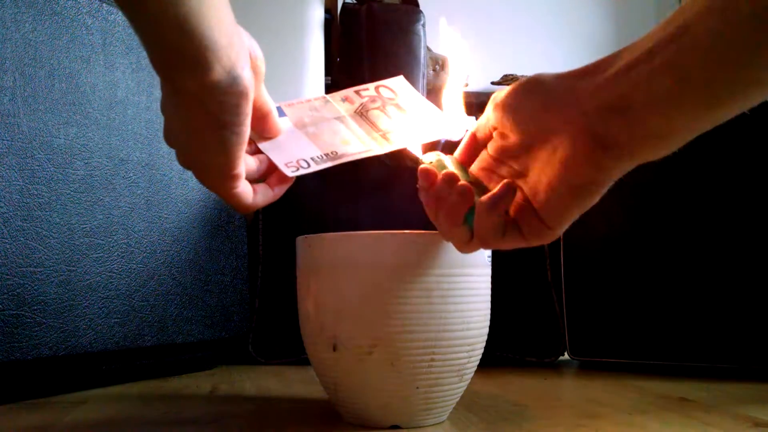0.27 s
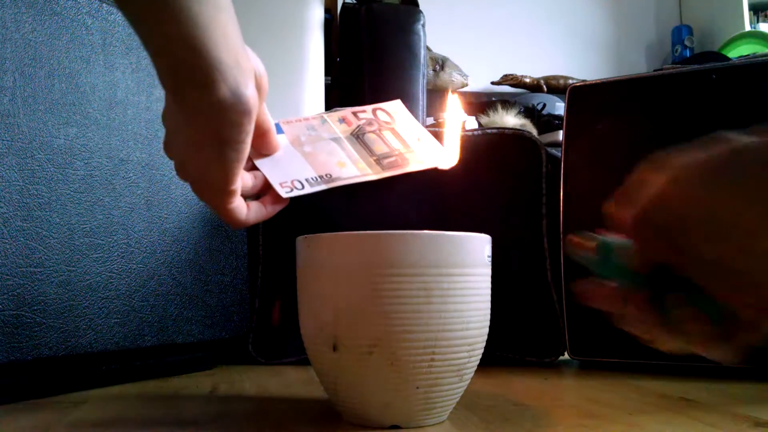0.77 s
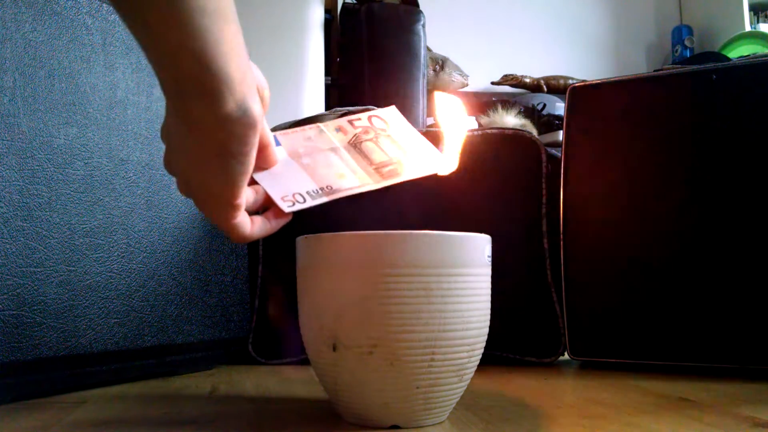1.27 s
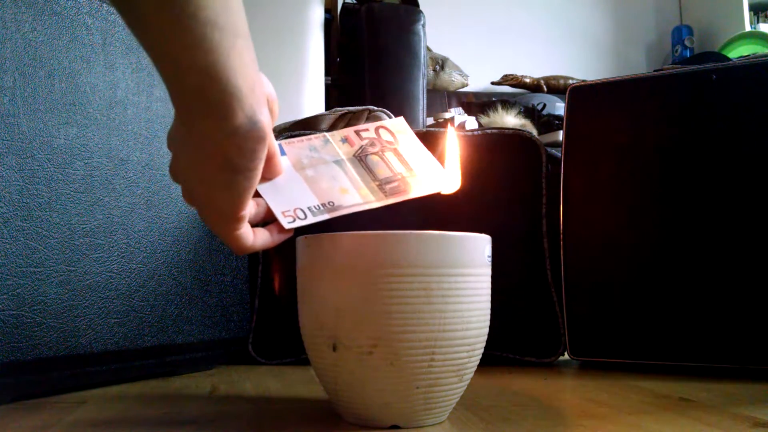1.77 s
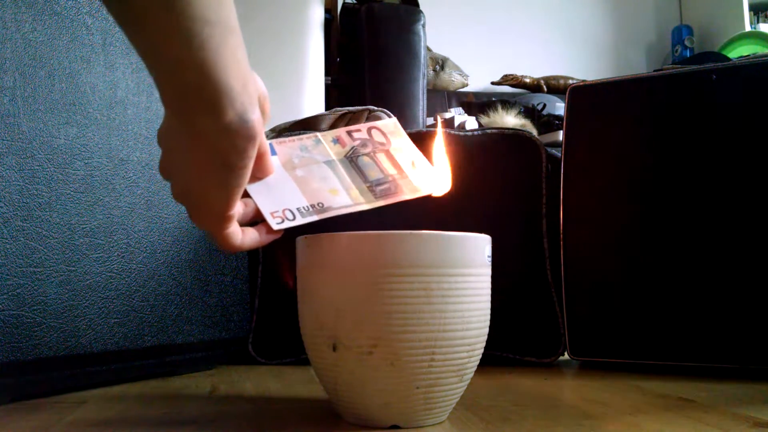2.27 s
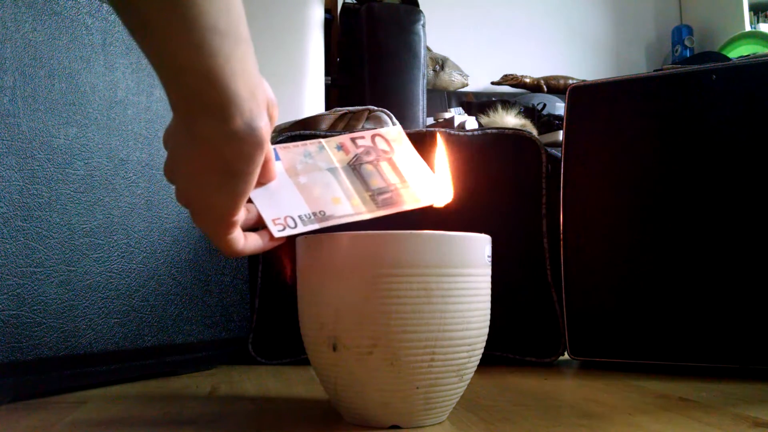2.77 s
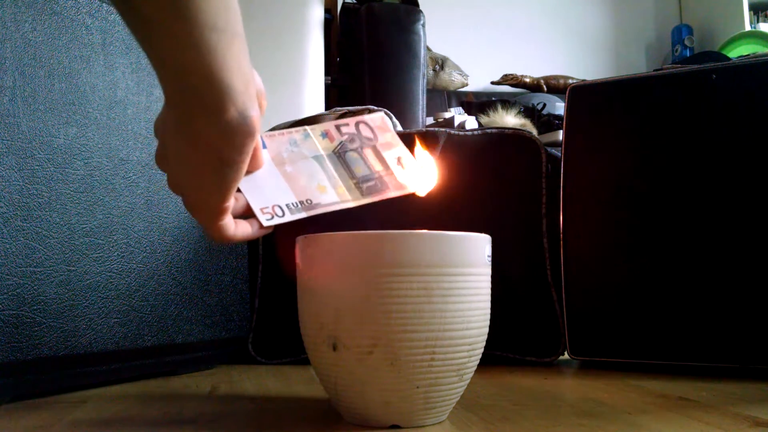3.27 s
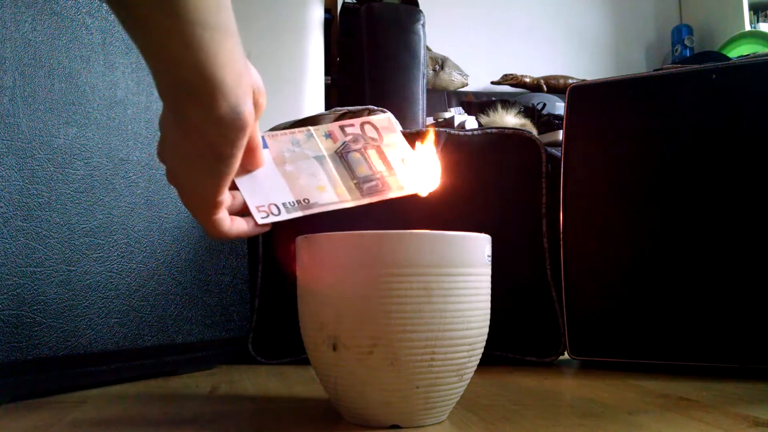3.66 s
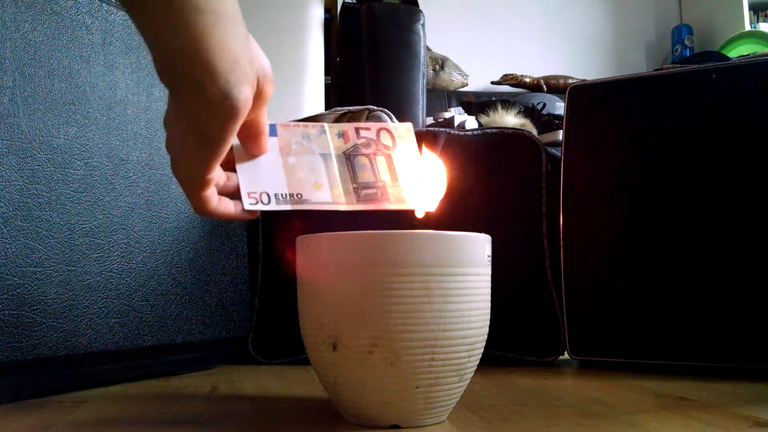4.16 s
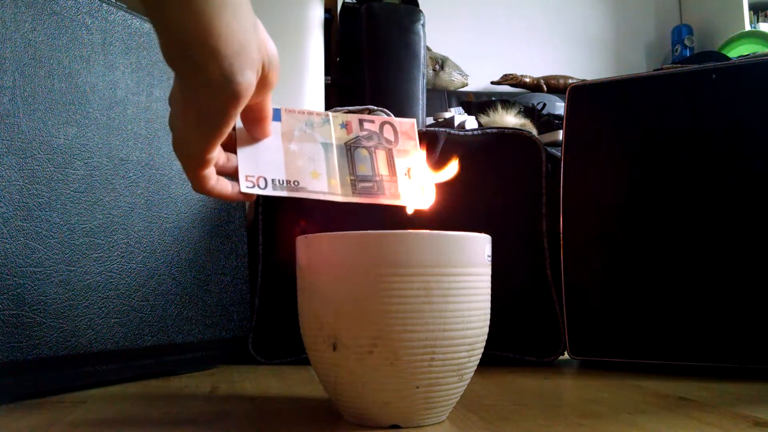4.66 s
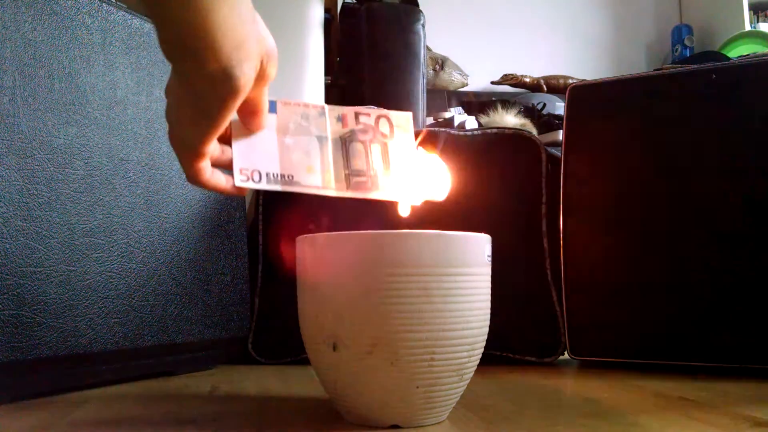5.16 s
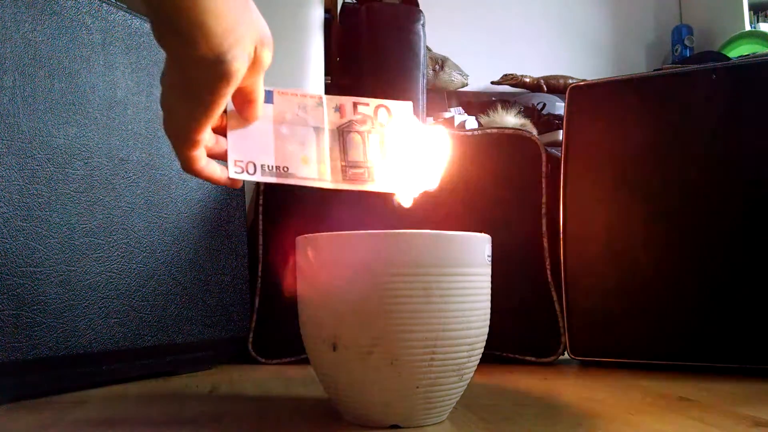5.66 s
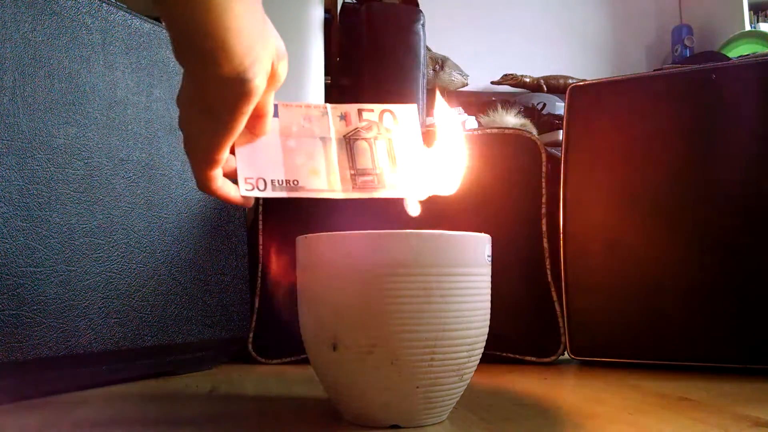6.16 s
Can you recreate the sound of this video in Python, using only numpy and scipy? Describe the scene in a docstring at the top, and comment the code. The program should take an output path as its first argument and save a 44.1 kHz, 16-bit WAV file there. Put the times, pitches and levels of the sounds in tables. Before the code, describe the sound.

A paper note burns close by in a quiet room, with a soft, high hiss and scattered tiny crackles throughout. In the first half second a lighter gives several small clicks and brief rushes of flame, followed by a soft bump. At about 1.7 seconds the plastic lighter hits a wooden floor with a sharp, hollow knock, by far the loudest sound, then bounces and settles by 1.9 seconds. A dull bump and a short sleeve rustle come at 2.4 seconds, with more soft floor bumps around 3.8 and 4.4 seconds. The crackles become more frequent from about 2.8 seconds, joined by small hollow pops from a ceramic pot under the flame. From 5.4 seconds until the end, near 6.4, the fire grows livelier, with stronger hiss, sharper snaps and a faint low flutter. Further off, something ticks faintly and evenly, about every two thirds of a second.

```python
"""Paper burning over a ceramic pot

The flame hisses, crackles and drives the air in the pot as a cavity resonator. A lighter is handled,
then dropped on a wooden floor, where it bounces and excites the modes of boards and shell. Soft bumps
come through the floor, and something ticks evenly further off in the room. Two microphone ports a
hand apart are cross-subtracted with a delay to widen the stereo image."""
import sys
import numpy as np
from scipy import signal
from scipy.fft import rfft, irfft, next_fast_len
from scipy.io import wavfile

SR = 44100
rng = np.random.default_rng(int(sys.argv[2]) if len(sys.argv) > 2 else 0)


def master(y):
    """Save y as 16-bit WAV."""
    cut = np.clip(np.atleast_2d(y).T, -1, 1)
    pcm = np.round(cut * 32767)  # scale
    wavfile.write(sys.argv[1], SR, pcm.astype(np.int16))


N = 283122
SIZE = next_fast_len(N + SR)   # room for tails
HZ = np.fft.rfftfreq(SIZE, 1 / SR)

# Vigour of the fire, as the level of its hiss: t/s, level/dB
FIRE_VIGOUR = [(0.0, -55), (0.3, -53.5), (0.65, -58), (1.1, -55.5), (1.5, -59.5), (2.2, -55.5), (2.9, -56),
               (3.4, -55.5), (3.75, -59.5), (4.25, -56), (4.6, -57.5), (4.95, -54.5), (5.4, -54.5),
               (5.62, -48.5), (5.93, -54.5), (6.15, -51), (6.42, -52)]
# Wandering centre of a bright band in the hiss: t/s, f/Hz
SIZZLE_CENTRE = [(0.0, 12300), (4.3, 12070), (4.9, 12700), (5.6, 11570), (5.9, 12140), (6.2, 12900),
                 (6.42, 12600)]
# Loudest crackles of the paper: t/s, level/dB, f/Hz, body relative to snap/dB
PAPER_CRACKLES = [(0.8909, -37, 11200, -8), (1.0969, -37, 10000, 2), (1.217, -40, 9000, 5),
                  (1.2445, -33.5, 10000, -6), (1.5773, -35, 11300, -16), (2.182, -41, 12500, -11),
                  (2.3037, -38, 11900, -18), (2.6754, -37, 12500, -4), (2.718, -46, 13000, -13),
                  (2.852, -30, 9900, -3), (2.855, -24, 12400, -6), (3.0182, -33, 11500, 0),
                  (3.045, -42, 13500, -18), (3.117, -39, 9740, -3), (3.143, -35, 12500, -1),
                  (3.179, -38, 11800, -7), (3.495, -37, 9830, -5), (3.5544, -34, 12900, -8),
                  (3.5944, -31, 14500, -13), (3.7724, -33, 14500, -10), (3.9216, -29.5, 13000, -14),
                  (4.1463, -30, 13500, -13), (4.367, -43, 10000, -12), (4.497, -35, 10500, -12),
                  (4.6414, -29, 13500, -17), (4.81, -34, 12100, 2), (4.9125, -30, 12700, -20),
                  (5.184, -32, 12600, -10), (5.2475, -38, 12100, -8), (5.426, -36, 12000, 5),
                  (5.5094, -34, 12000, -1), (5.538, -31, 11200, 1), (5.5517, -27, 11400, -1.5),
                  (5.608, -34.5, 10700, 4.5), (5.706, -36, 9150, 5), (5.7584, -35, 11900, -16),
                  (5.8631, -35, 12500, -10), (5.9714, -36, 12000, -9), (6.075, -33, 12000, 1),
                  (6.141, -41, 12400, -10), (6.156, -21.5, 12700, -30), (6.2248, -25.5, 12900, -7),
                  (6.255, -25.5, 12400, -2), (6.3156, -38, 12500, 0)]
# Short hollow pops of the pot, from flame puffs and the tick's second blow: t/s, level/dB
POT_POPS = [(0.822, -42.5), (1.033, -49), (1.332, -47), (2.58, -48), (2.83, -38), (2.852, -41),
            (2.974, -44.5), (3.693, -44), (4.05, -46), (4.459, -40), (4.887, -46.5), (4.979, -41.5),
            (5.093, -40), (5.189, -48), (5.318, -42.5), (5.344, -42.5), (5.455, -35), (5.539, -42.5),
            (5.679, -35), (5.751, -39), (5.818, -37), (5.916, -55), (5.982, -36), (6.098, -38),
            (6.157, -50), (6.254, -32.5), (6.293, -36), (6.33, -38)]
# Low flutter of the flame: t/s, level/dB
FLUTTER_LEVEL = [(0.0, -58), (0.5, -72), (1.1, -81), (1.7, -74), (2.43, -72), (3.0, -62), (3.5, -71),
                 (3.92, -66), (4.43, -71.5), (5.4, -66.5), (5.65, -56), (5.95, -70), (6.42, -58)]
# Brief rushes of noise, the lighter's flame humming in the pot, hand and sleeve rustles, then two sputters of
# the fire: # t/s, hold/s, level/dB, swell/(dB/s), fade/(dB/s), grain/dB, pot hum/dB
RUSHES = [(0.0, 0.013, -48.5, 28, 101, 3, -21), (0.073, 0.043, -51.5, 150, 200, 4, 2.5),
          (0.279, 0.0065, -43.5, 6000, 500, 4.5, -19), (0.31, 0.0054, -51, 3000, 400, 2.5, -11),
          (0.335, 0.0073, -57, 1500, 202, 5, -19), (2.43, 0.19, -49, 133, 114, 1.6, -19),
          (3.49, 0.028, -53, 300, 180, 2, -3.5), (5.32, 0.02, -55, 1000, 300, 3.5, -10),
          (6.06, 0.036, -54, 400, 200, 2.5, -12)]
# Clicks of the lighter in the hand: t/s, level/dB
LIGHTER_CLICKS = [(0.0284, -50), (0.0352, -54), (0.0697, -40), (0.2406, -49), (0.2782, -37), (0.307, -36),
                  (0.3376, -40), (0.344, -44)]
# Modes of the ticking object: f/Hz, level/dB, T60/s
TICK_MODES = [(1270, 6, 0.19), (1290, -0.5, 0.13), (1730, 1.5, 0.13)]
# Soft bumps through the floor: t/s, level/dB, f/Hz
FLOOR_BUMPS = [(0.452, -33.5, 212), (0.668, -40.5, 200), (0.743, -42, 230), (0.886, -41.5, 226),
               (1.032, -46.5, 220), (1.203, -43, 250), (1.262, -43, 150), (1.377, -46, 190),
               (2.412, -32.5, 164), (3.7504, -38, 244), (3.767, -41, 230), (3.803, -36.5, 216),
               (4.377, -35, 202), (5.227, -45, 201), (5.619, -37.5, 143), (5.749, -38.5, 205),
               (6.053, -42, 180)]
# Fall, bounce and two settling touches of the lighter: t/s, level/dB, brightness/dB, pot response/dB,
# board tilt/(dB/octave), tank knock/dB, position along the boards (0 near, 1 far)
LANDINGS = [(1.654, -2, -2.5, 2, -1.5, -45, 0.0), (1.805, -10.5, 0, 3.5, 4, -23.5, 1.0),
            (1.8093, -21, -10, 8, -1, -26, 0.9), (1.874, -28, -11, -6, -4, -38, 0.94)]
# Modes of the floorboards: f/Hz, level/dB, T60/s, change at the far position/dB
BOARD_MODES = [(161, -7, 0.072, -1), (198, -7, 0.12, -6), (276, -19, 0.06, -2), (393, -3, 0.037, -1),
               (432, -14.5, 0.08, -2), (485, -1.5, 0.095, -4), (535, -11, 0.11, -11), (728, -20, 0.14, -1),
               (773, -17, 0.08, 5.5), (840, -20, 0.075, 7), (895, -7.5, 0.039, -4),
               (1157, -5.5, 0.016, -1.5), (1432, -14, 0.033, 0.5), (1550, -21.5, 0.065, -1),
               (1690, -12.5, 0.014, 3.5), (2410, -35, 0.0093, 4)]
# Modes of the lighter's plastic shell: f/Hz, level/dB, T60/s
SHELL_MODES = [(3740, -19, 0.002), (3790, -29.5, 0.022), (4130, -34, 0.024), (6400, -26.5, 0.006),
               (5100, -23.5, 0.0026), (8600, -44, 0.0032), (11200, -60, 0.0025)]
# Reflections from furniture near the landing: delay/ms, level/dB
FURNITURE_ECHOES = [(2.6, -5.5), (6.8, -14.5), (11.5, -14), (20.5, -14)]
# Reverberation by band: lower f/Hz, upper f/Hz, level/dB, T60/s
REVERB_BANDS = [(120, 190, -6, 0.38), (250, 554, -4, 0.45), (430, 830, 1.5, 0.4), (890, 2120, 5, 0.33),
                (1780, 3100, 3, 0.24), (3360, 4250, 1.5, 0.31), (4640, 6600, -1, 0.36),
                (7200, 18000, -2, .18)]
# Spectral densities of the noises: f/Hz, level/dB
HISS_SPECTRUM = [(1500, -62), (4000, -17), (7000, -7), (9000, -5.5), (11300, -0.5), (13200, -3.5),
                 (14300, -4), (15500, -2.5)]
FLUTTER_SPECTRUM = [(50, -19), (100, 0), (180, 2.5), (300, -7), (600, -28)]
RUSH_SPECTRUM = [(150, 6), (550, -2), (1200, 6.5), (2500, 0), (4500, 5), (6500, 4.5), (7600, -2.5),
                 (9500, 8.5), (13000, -7), (15500, 3.5)]
CLACK_SPECTRUM = [(100, -10), (300, 10), (590, 2), (850, -6.5), (1500, -4), (2200, -6.5), (3500, -49)]
ROOM_SPECTRUM = [(30, -85), (60, -87), (150, -81.5), (300, -88), (500, -102.5), (900, -104), (2000, -125)]
MICROPHONE_SPECTRUM = [(25, -106), (60, -80.5), (200, -91.5), (500, -101), (1000, -100), (1800, -100),
                       (2500, -103), (4500, -101), (9000, -104), (15500, -105)]

POT_HZ, POT_T60_S = 584, 0.023


def from_db(db):
    """Amplitude ratio of a level."""
    return 10 ** (np.asarray(db) / 20)


def curve(rows):
    """Linear interpolation of a table in time."""
    return np.interp(np.arange(N) / SR, *np.transpose(rows))


def shape(x, response):
    """Convolution as a product of spectra."""
    return irfft(rfft(x, SIZE) * response, SIZE)[..., :N]


def late(x, ms):
    """A pure delay."""
    lag = round(ms * SR / 1000)
    return np.concatenate([np.zeros(lag), x[:N - lag]])


def noise(spectrum, unit_rms=True):
    """Filtered white noise, at unit rms or at the stated density."""
    hz, db = np.transpose(spectrum)
    x = shape(rng.standard_normal(N), from_db(np.interp(np.log(HZ + 1), np.log(hz), db)))
    return x / x.std() if unit_rms else x * np.sqrt(SR / 2)


def drift(hz):
    """Low-pass random fluctuation of unit variance."""
    x = shape(rng.standard_normal(N), 1 / (1 + (HZ / hz) ** 2))
    return x / x.std()


def clicks(times, db):
    """An impulse train."""
    out = np.full(N, 1e-18)
    np.add.at(out, np.round(np.asarray(times) * SR).astype(int), from_db(db))
    return out


def ring(x, hz, t60):
    """A damped oscillator: a unit impulse starts a decaying unit sine."""
    r, w = from_db(-60 / (t60 * SR)), 2 * np.pi * hz / SR
    return signal.lfilter([0, np.sin(w)], [1, -2 * r * np.cos(w), r * r], x)


def soften(x, hz):
    """A critically damped low-pass, as in a soft contact."""
    r = np.exp(-2 * np.pi * hz / SR)
    return signal.lfilter([(1 - r) ** 2], [1, -2 * r, r * r], x)


def highpass(x, hz, order=2):
    """Attenuation below a corner frequency."""
    return signal.sosfilt(signal.butter(order, hz, "high", fs=SR, output="sos"), x)


def flame_hiss(fire_db):
    """Amplitude-modulated noise: a broad hiss and a narrow sizzle that outgrows it as the fire rises."""
    hiss = from_db(fire_db + 3.2 * drift(110)) * noise(HISS_SPECTRUM)
    phase = 2 * np.pi * np.cumsum(curve(SIZZLE_CENTRE)) / SR
    baseband = soften(rng.standard_normal((2, N)), hz=780)
    sizzle = np.sum(baseband * [np.cos(phase), np.sin(phase)], axis=0)
    sizzle_db = fire_db - 12.5 + 1.18 * (fire_db - fire_db.mean()) + 1.8 * drift(14) + 2 * drift(150)
    return hiss + from_db(sizzle_db) * sizzle / sizzle.std()


def paper_crackle(fire_db, sizes, snaps_per_s=70, snap_t60_s=1 / 2000):
    """Impulse responses: random and listed crackles each give a bright snap and a lower body."""
    impulses = (rng.random(N) < snaps_per_s / SR) * sizes * from_db(fire_db - 9)
    grit_per_s = 900 * from_db(2 * (fire_db - fire_db.mean()) + 5 * drift(12))
    impulses += (rng.random(N) < grit_per_s / SR) * sizes * from_db(fire_db.mean() - 14.5)
    snap = ring(ring(impulses, 10000, 0.00052), 14800, 0.00061) * from_db(5)
    for start, peak_db, hz, _ in PAPER_CRACKLES:
        burst = ring(ring(signal.unit_impulse(160), hz, snap_t60_s), hz, snap_t60_s)
        snap[round(start * SR):][:len(burst)] += from_db(peak_db) * burst / np.abs(burst).max()
    at, db, _, body_db = np.transpose(PAPER_CRACKLES)
    drive = 0.32 * impulses + clicks(at, db + body_db)
    body = ring(drive, 6700, 0.001) - 0.3 * ring(drive, 3600, 0.00095)
    return highpass(snap, 7500), body


def rim_reflection(spread, snap):
    """The glaze reflects point-like snaps best; the sheet screens part of their direct sound."""
    return spread + 0.7 * snap + late(0.35 * spread + 1.5 * snap, ms=1.6)


def pot_hum(fire_db, sizes, puffs_per_s=260, pop_ms=2.4, detuning=0.048):
    """Cavity resonance: draught, flame puffs, tick blows and floor jolts drive the air in the pot."""
    drive_db = -60 + 0.81 * (fire_db - fire_db.mean())
    pops = clicks(*np.transpose(POT_POPS))
    pops += (rng.random(N) < puffs_per_s / SR) * np.clip(sizes, -3, 3) * from_db(drive_db - 4.5)
    at, db, _ = np.transpose(FLOOR_BUMPS)
    jolts = late(clicks(at, db - 6.5), ms=2.43)
    draught = from_db(drive_db - 23.5 + 1.8 * drift(30)) * rng.standard_normal(N)
    decay = signal.lfilter([1], [1, -np.exp(-1000 / (pop_ms * SR))], np.abs(pops))
    bursts = decay * rng.standard_normal(N)
    # a pop builds up over a few cycles at the mouth
    push = ring(pops + jolts + from_db(-28.5) * bursts, POT_HZ, t60=0.011) / 23.9
    step = np.clip(np.round(drift(12)), -1, 1)   # the flame over the mouth detunes the pot
    hum = sum(ring((draught + push) * (step == k), POT_HZ * (1 + detuning * k), POT_T60_S)
              for k in (-1, 0, 1))
    onsets = from_db(9) * soften(pops, hz=5400)
    sputter = from_db(-21) * ring(bursts, hz=1480, t60=0.0026)
    return highpass(hum + onsets + sputter, 330)   # the pot radiates little bass


def flame_flutter():
    """Low-frequency noise, amplitude-modulated by the unsteady flame."""
    return from_db(curve(FLUTTER_LEVEL) + 2.4 * drift(12)) * noise(FLUTTER_SPECTRUM)


def lighter_flame_and_rustle():
    """Noise excitation: the lighter's flame, hand and sleeve, and late sputters of the fire give rushes that
    sound the pot."""
    t = np.arange(N) / SR
    grain = 0.44 * drift(71) + drift(570)
    hum = ring(rng.standard_normal(N), POT_HZ, POT_T60_S)
    rush = noise(RUSH_SPECTRUM)
    out = np.zeros(N)
    for at, hold, db, swell, fade, grain_db, hum_db in RUSHES:
        envelope = from_db(db - np.maximum(swell * (at - t), fade * np.maximum(t - at - hold, 0)))
        out += envelope * (from_db(grain_db * grain) * rush + from_db(hum_db) * hum / hum.std())
    return out


def room_tone():
    """Spatial coherence: long waves are much alike at both ports."""
    separate = np.array([noise(ROOM_SPECTRUM, unit_rms=False) for _ in range(2)])
    common = noise(ROOM_SPECTRUM, unit_rms=False)
    return (0.52 * separate + 1.3 * common) * from_db(1.4 * drift(12))


def lighter_clicks():
    """Impulse excitation: each touch of the lighter rings three damped modes."""
    touch = clicks(*np.transpose(LIGHTER_CLICKS))
    return ring(touch, 4500, 0.0036) + 2.3 * ring(touch, 7800, 0.00055) + 0.5 * ring(touch, 555, 0.047)


def ticking(period_s=0.6635, drive_db=-52):
    """Scattering by the walls blurs a distant double tick into a soft clack and faint, rough ringing."""
    at = 0.108 + period_s * np.arange(10)
    blows = clicks(at, drive_db - 3.5 + 0.7 * rng.standard_normal(len(at)))
    blows += clicks(at + 0.048, drive_db - 13)
    envelope = soften(blows, hz=12.2) * SR / 14 * from_db(-2.5)
    clack = envelope * np.array([noise(CLACK_SPECTRUM), noise(CLACK_SPECTRUM)])
    scattered = 0.28 * late(blows, ms=6) + soften(blows, hz=40) * from_db(15.5) * rng.standard_normal(N)
    ringing = sum(from_db(db) * ring(scattered, hz, t60) for hz, db, t60 in TICK_MODES)
    return clack + late(ringing, ms=10.5)


def floor_bumps():
    """Soft contact: each bump excites one low, damped mode of the floor."""
    return -sum(ring(soften(clicks([at], [db]), 1000), hz, t60=0.042) for at, db, hz in FLOOR_BUMPS)


def lighter_drop():
    """Modal superposition: each landing cracks and rings boards, shell and tank; the pot responds."""
    at, force_db, bright_db, pot_db, tilt, tank_db, spot = np.transpose(LANDINGS)
    boards = np.zeros(N)
    for k, (hz, db, t60, far_db) in enumerate(BOARD_MODES):
        mode_db = force_db + db - 11.5 + spot * far_db + tilt * np.log2(hz / 500)
        boards += (-1) ** k * ring(clicks(at, mode_db), hz, t60)
    shell = sum(ring(clicks(at, force_db + bright_db + db + 6.5), hz, t60) for hz, db, t60 in SHELL_MODES)
    tank = ring(clicks(at, tank_db), hz=685, t60=0.026)
    decay = signal.lfilter([1], [1, -from_db(-60 / (0.061 * SR))], clicks(at, force_db + bright_db - 24))
    crack = decay * soften(rng.standard_normal(N), hz=10000)
    pot_answer = ring(soften(clicks(at, force_db + pot_db - 2), hz=5300), POT_HZ, t60=0.019)
    return highpass([shell + tank + crack - boards, -pot_answer], 135, order=3)


def ports(x, lag_us, treble_db):
    """Path difference: the left port hears late, its treble shadowed by the case (raised if > 0 dB)."""
    shelf = from_db(treble_db * HZ ** 2 / (HZ ** 2 + 2270 ** 2))
    return np.array([shape(x, shelf * np.exp(-2j * np.pi * HZ * lag_us / 10 ** 6)), x])


def reverberation(x, onset_ms=11.6):
    """A diffuse field: each port's tail is uneven noise that builds up, then decays band by band."""
    t = np.arange(SR // 2) / SR
    lumps_db = 2 * np.array([drift(40)[:len(t)], drift(40)[:len(t)]])
    envelope = (1 - np.exp(-t * 1000 / onset_ms)) * from_db(lumps_db)
    white = rng.standard_normal((2, len(t))) / 20
    tail = 0
    for low_hz, high_hz, db, t60 in REVERB_BANDS:
        band = signal.butter(2, [low_hz, high_hz], "band", fs=SR, output="sos")
        tail += from_db(db - 60 * t / t60) * signal.sosfilt(band, white)
    return shape(x, rfft(envelope * tail, SIZE))


def scene():
    """Superposition of direct sound, reflections and reverberation at the two ports."""
    fire_db = curve(FIRE_VIGOUR) + drift(6.6)
    hiss = flame_hiss(fire_db)
    # signed amplitudes of random snaps and puffs: many small, few large
    sizes = from_db(6.2 * np.minimum(rng.exponential(1, N), 3.5)) * rng.choice([-1, 1], N)
    snap, body = paper_crackle(fire_db, sizes)
    flame = rim_reflection(hiss + body, snap)
    pot, flutter = pot_hum(fire_db, sizes), flame_flutter()
    handling = lighter_flame_and_rustle() + lighter_clicks() + floor_bumps()
    tick = ticking()
    landing, pot_answer = lighter_drop()
    echoes = sum(from_db(db) * late(landing + 0.61 * pot_answer, ms) for ms, db in FURNITURE_ECHOES)
    into_room = landing + 0.81 * pot_answer + 0.43 * handling + 0.5 * tick[0] + pot + 0.5 * flame
    return (ports(flame, lag_us=237, treble_db=-23) + ports(pot, lag_us=140, treble_db=-38)
            + ports(flutter, lag_us=194, treble_db=12) + ports(handling, lag_us=237, treble_db=-30)
            + ports(landing, lag_us=176, treble_db=-49) + ports(pot_answer, lag_us=293, treble_db=17)
            + ports(soften(echoes, hz=4800), lag_us=67, treble_db=-30)[::-1]   # from the left
            + tick + from_db(-12.5) * reverberation(into_room) + room_tone())


def record(dry, cross_delay_s=1 / 2656, cutoff_hz=15650):
    """Interference: each noisy port loses a delayed, dulled copy of the other, then is band-limited."""
    heard = dry + np.array([noise(MICROPHONE_SPECTRUM, unit_rms=False) for _ in range(2)])
    cross_band = HZ ** 2 / (HZ ** 2 + 62.6 ** 2) / (1 + (HZ / 6280) ** 4)
    cross = 0.87 * cross_band * np.exp(-2j * np.pi * HZ * cross_delay_s)
    wide = highpass(heard - shape(heard[::-1], cross), 40)
    return signal.sosfilt(signal.cheby2(16, 60, cutoff_hz + 250, fs=SR, output="sos"), wide)


dry = scene()
out = record(dry)
master(out)
```